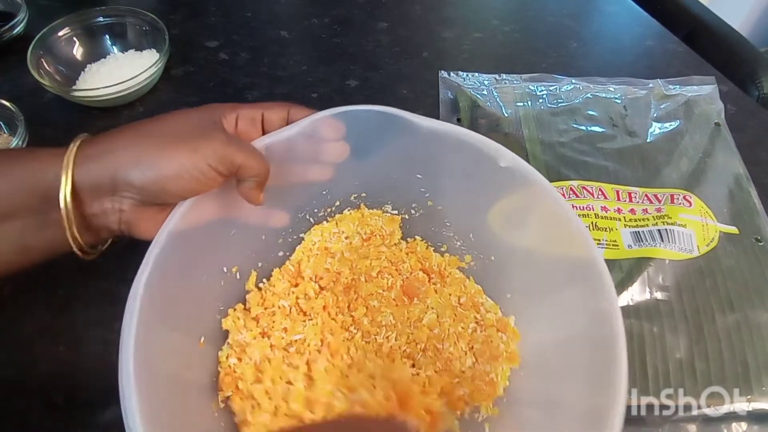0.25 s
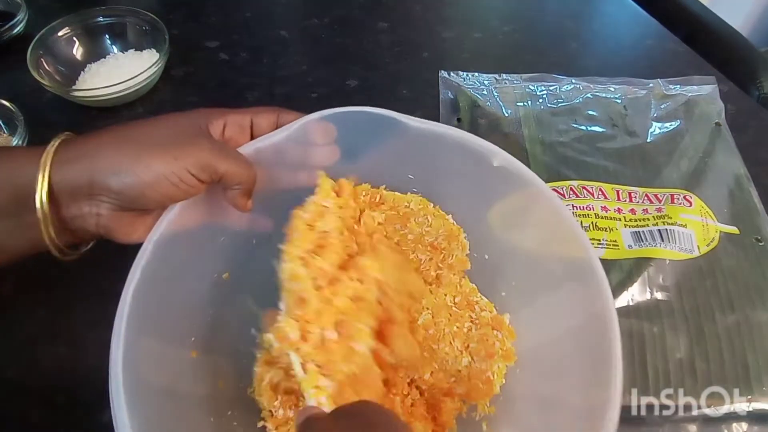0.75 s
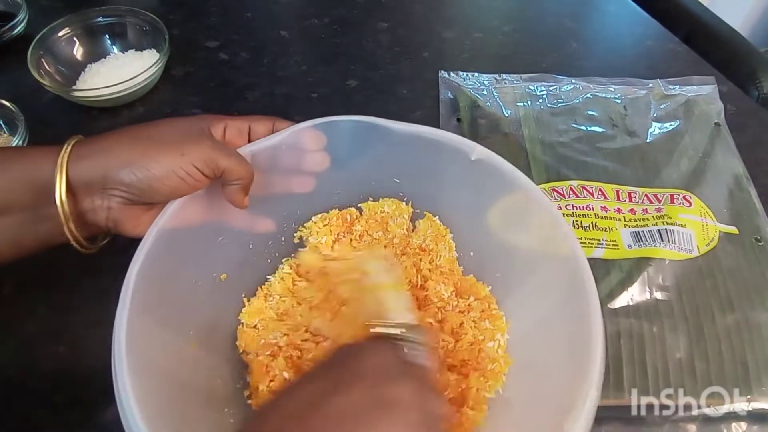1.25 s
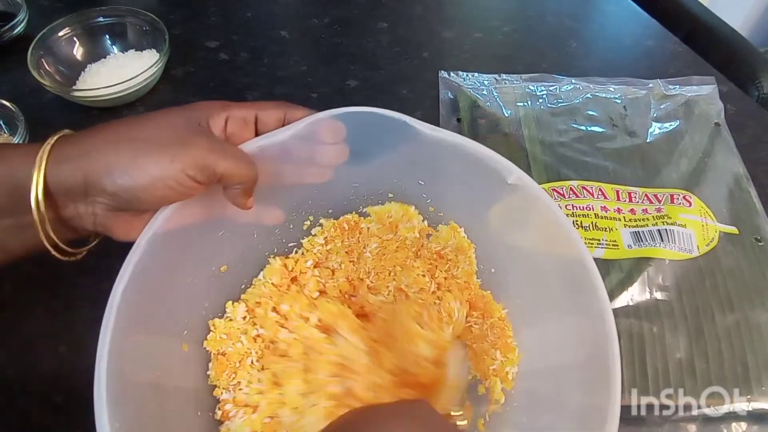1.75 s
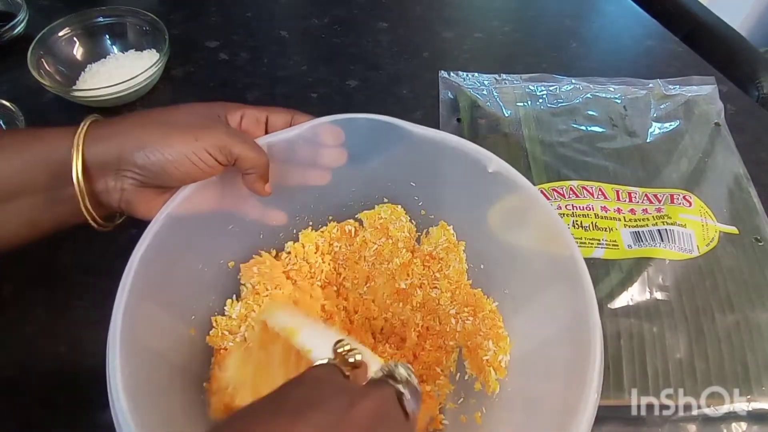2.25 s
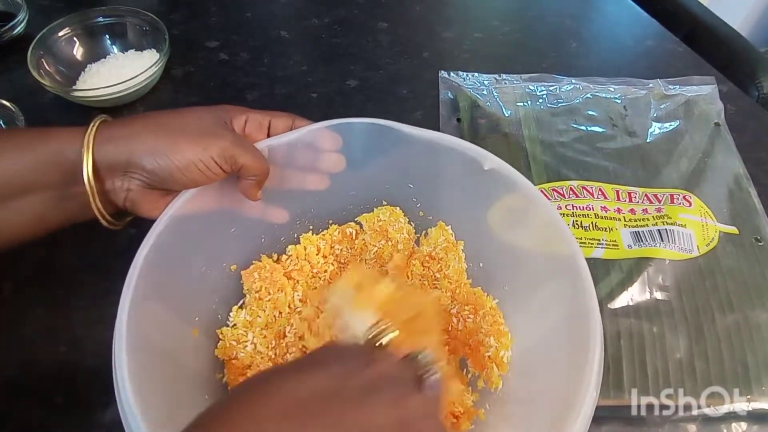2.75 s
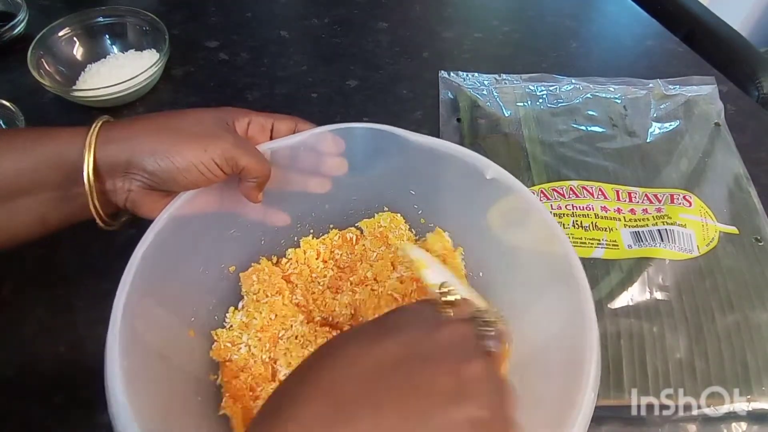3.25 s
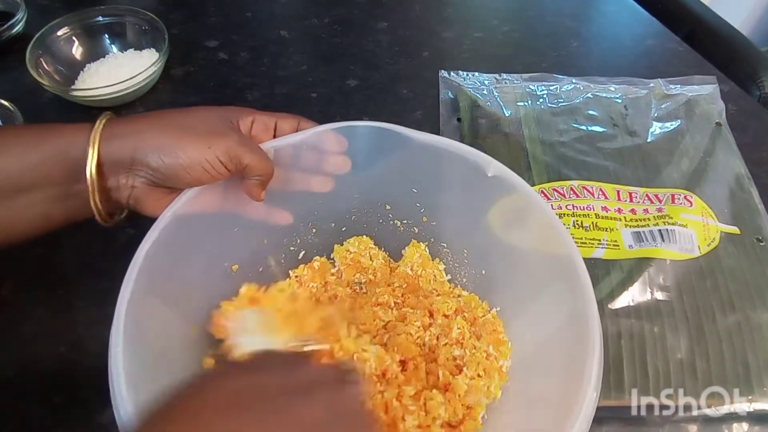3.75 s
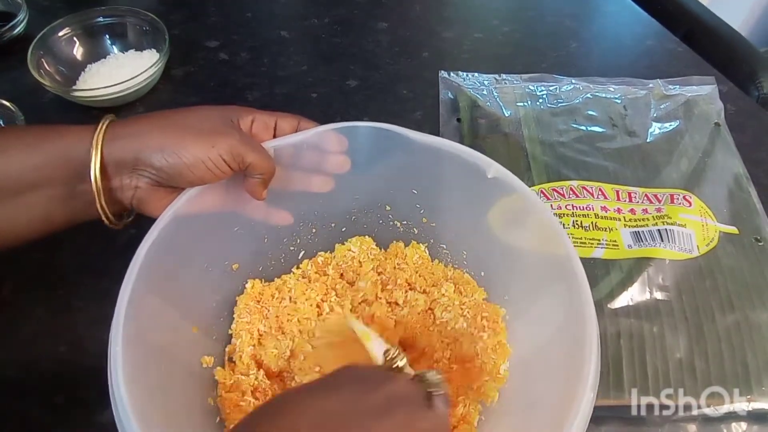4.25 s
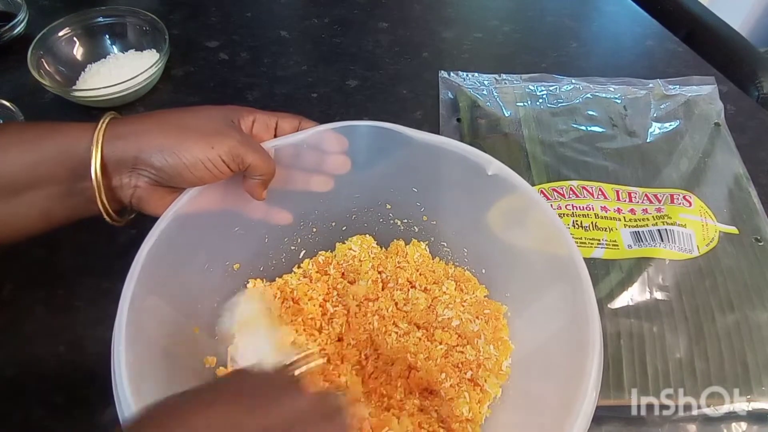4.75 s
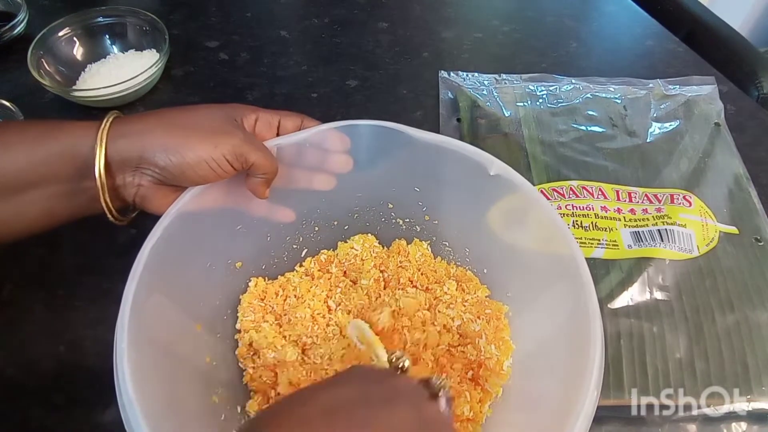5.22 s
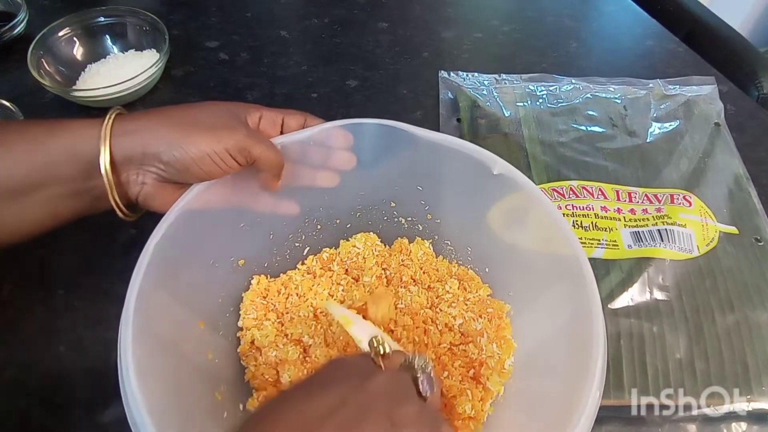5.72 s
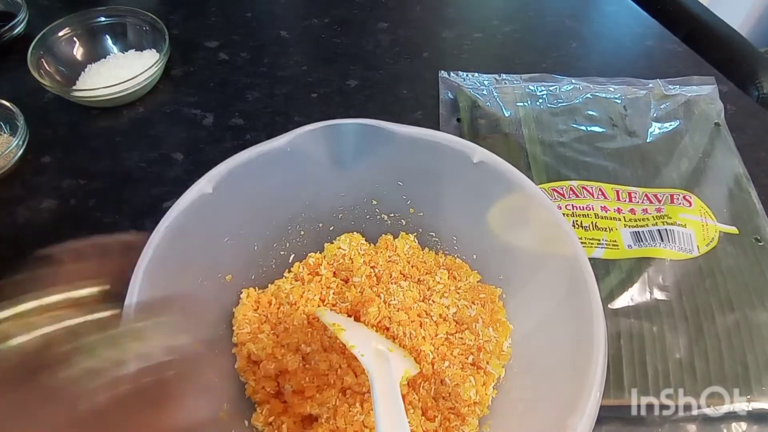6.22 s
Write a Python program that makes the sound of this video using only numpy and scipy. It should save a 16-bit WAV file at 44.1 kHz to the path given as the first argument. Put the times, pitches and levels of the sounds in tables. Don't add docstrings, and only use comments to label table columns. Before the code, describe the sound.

Close, rasping strokes through damp grit in a plastic bowl, punctuated by hard blade knocks, then lighter stirring and a final strong knock.

```python
import sys
import numpy as np
from scipy import signal
from scipy.fft import rfft, irfft, next_fast_len
from scipy.io import wavfile
from scipy.ndimage import uniform_filter1d, map_coordinates

SR = 44100
rng = np.random.default_rng(int(sys.argv[2]) if len(sys.argv) > 2 else 0)


def ratio(d):
    e = np.asarray(d, float) / 20
    return 10 ** e


def unload_wav(signal):
    wavfile.write(
        sys.argv[1],
        SR,
        np.round(np.clip(np.atleast_2d(signal).T, -1, 1) * 32767).astype(np.int16),
    )


N = 285617

# (frequency [Hz], level [dB per Hz])
FLAKE_COLOUR = [(7000, -27.5), (8500, 3), (10500, 0.5), (12500, -5.5), (15000, -2.5), (16000, -3.5)]


def unit(x):
    return x / np.sqrt(np.mean(x ** 2) + 1e-20)


def along(points, hz):
    f, v = np.transpose(points)
    return np.interp(np.log(hz + 1), np.log(f + 1), v)


def filtered(x, response):
    m = next_fast_len(N + SR // 2)
    return irfft(rfft(x, m) * response(np.fft.rfftfreq(m, 1 / SR)), m)[:N]


def coloured(x, points):
    return unit(filtered(x, lambda hz: ratio(along(points, hz))))


def resonated(x, peaks):
    def response(f):
        total = 0
        for k, (centre, width, db) in enumerate(peaks):
            damping = 1j * f * width
            total = total + (-1) ** k * ratio(db / 2) * damping / (centre * centre - f * f + damping)
        return total ** 2
    return unit(filtered(x, response))


def wobble(rate, count=N):
    at = np.arange(0, count + 8, 8)
    knots = rng.standard_normal(int(count * rate / SR) + 4)
    return np.interp(np.arange(count), at, map_coordinates(knots, [at * rate / SR]))


def swells(s, db, rise, fall):
    roundness = 1.457
    t = np.arange(0, N / SR, .002)
    late = t[:, None] - s
    shape = db - 20 * np.abs(late / np.where(late < 0, rise, fall)) ** roundness
    return np.interp(np.arange(N) / SR, t, np.sqrt((ratio(shape) ** 2).sum(axis=1)))


def grit(rate, spread_db, smooth, clump_db):
    size = ratio(spread_db * np.minimum(rng.exponential(size=N), 2.2))
    snaps = (rng.random(N) < rate / SR) * rng.standard_normal(N).clip(-2, 2) * size
    return ratio(clump_db * wobble(45)) * (unit(snaps) + smooth * rng.standard_normal(N))


def mottled(x, depth_db, size):
    z = signal.stft(x, nperseg=size)[2]
    field = uniform_filter1d(rng.standard_normal(z.shape), size=2, axis=0)
    field = uniform_filter1d(field, size=4, axis=1)
    return signal.istft(z * ratio(depth_db * unit(field)), nperseg=size)[1][:N]


def kitchen(x):
    # (frequency [Hz], t60 [s])
    decay = [(200, 0.28), (1000, 0.336), (4000, 0.33), (9000, 0.075)]
    hz, t, z = signal.stft(rng.standard_normal(SR // 2), SR, nperseg=256)
    tail = signal.istft(z * ratio(-60 * t / along(decay, hz)[:, None]), SR, nperseg=256)[1]
    delayed = np.pad(x, (170, 0))
    return signal.fftconvolve(delayed, tail / np.linalg.norm(tail))[:len(x) + SR // 2]


def air():
    # (frequency [Hz], level [dB per Hz])
    air_colour = [(15, -39.5), (35, -22), (96, 5.5), (156, -12), (199, 3.5), (303, -4), (514, -6.5),
                  (854, -7.5), (1270, -17), (2210, -12.5), (3740, -25), (4470, -21), (4880, -52),
                  (6340, -63.5), (10700, -120)]
    # (frequency [Hz], width [Hz], level [dB])
    hum_mode = [(208.4, 23, 0)]
    hiss = ratio(1.7 * wobble(27.0)) * coloured(rng.standard_normal(N), air_colour)
    hum = ratio(-9 + 2.1 * wobble(2.9)) * resonated(rng.standard_normal(N), hum_mode)
    return ratio(-78.5) * (hiss + hum)


def bangles():
    # (time [s], level [dB], frequency [Hz], t60 [s], unsteadiness [Hz])
    touches = [
        (0.0, -81, 4806, 0.22, 90),
        (0.0, -99, 4960, 0.471, 60),
        (0.155, -66, 3775, 0.43, 253.1),
        (0.158, -71, 4456, 0.341, 881.9),
        (0.992, -45, 4227, 0.0205, 500),
        (5.27, -62, 3673, 0.13, 118),
        (5.55, -55, 3574, 0.032, 300),
    ]
    out, t = np.zeros(N + SR), np.arange(SR // 2) / SR
    for s, db, hz, t60, rate in touches:
        onset = np.clip(t / 0.00386, 0, 1)
        shape = ratio(db - 60 * t / t60) * onset * wobble(rate, count=len(t))
        out[round(s * SR):][:len(t)] += shape * np.sin(2 * np.pi * hz * t)
    return out[:N]


def base():
    # (peak time [s], level [dB], fall over 20 dB [s])
    shifts = [(0.061, -74.5, -0.66), (1.23, -63.5, 0.2564), (1.62, -62, -0.05), (1.95, -60.5, -0.3055),
              (2.27, -66.5, -0.26), (2.56, -64.5, -0.42), (2.77, -66, 0.41), (3.62, -67, 0.0344),
              (4.05, -68.5, 0.21), (4.42, -67, 0.0535), (4.66, -65, -0.0878), (5.3, -71, 0.21)]
    # (frequency [Hz], width [Hz], level [dB])
    base_modes = [(201.2, 35, 3), (300, 37, -15)]
    s, db, fall = np.transpose(shifts)
    return swells(s, db, fall, fall) * resonated(rng.standard_normal(N), base_modes)


def slide():
    # (peak time [s], level [dB], fall over 20 dB [s])
    rocking = [(0.057, -64.5, -0.01), (0.301, -57.5, -0.06), (0.408, -55, -0.2327), (0.611, -48, -0.0769),
               (.816, -70, -0.4), (1.11, -64, 0.25), (1.39, -47.5, 0.0828), (1.612, -72, 1.51),
               (1.852, -42, 0.0038), (2.119, -41.5, 0.0036), (2.288, -69.5, 0.36), (2.67, -58, 0.14),
               (3.12, -44.5, 0.0717), (3.18, -53, 0.0976), (3.42, -39.5, 0.1031), (3.86, -69, 0.58),
               (4.24, -67, 0.15), (4.669, -49.5, 0.0843), (4.99, -49, 0.06), (5.063, -49, 0.0324),
               (5.3, -71.5, 0.27), (5.613, -69, 0.67), (5.898, -62, -0.7), (6.04, -50.5, 0.266),
               (6.12, -44, 0.02), (6.19, -54, 0.07), (6.28, -51, 0.15), (6.37, -51, -1.5),
               (6.45, -44, -0.174)]
    # (frequency [Hz], width [Hz], level [dB])
    counter_modes = [(92.6, 48, -3), (147.5, 43, 0), (206.1, 19, -1), (300, 35, -16)]
    s, db, fall = np.transpose(rocking)
    slips = grit(rate=66, spread_db=2.5, smooth=0.9, clump_db=3.5)
    gain = swells(s, db, 0.39 * fall, fall) + ratio(-92.5)
    return gain * resonated(slips, counter_modes)


def spray():
    # (time [s], level [dB], half-length [s])
    flicks = [
        (0.335, -81, 0.022),
        (0.488, -73.5, 0.03208),
        (1.816, -77, 0.03),
        (2.064, -67.5, 0.0015),
        (3.502, -89.5, 0.079),
    ]
    t = np.arange(N) / SR
    shape = sum(ratio(db) * np.exp(-((t - s) / half) ** 2) for s, db, half in flicks)
    return shape * coloured(grit(rate=530, spread_db=3.5, smooth=1.1, clump_db=6), FLAKE_COLOUR)


def knock(db, colour, crack_db, lasts):
    # (frequency [Hz], level [dB], t60 [s])
    bowl_modes = [(112, -15, 0.078), (229.6, -1.5, 0.14), (277, 5.5, 0.059), (384.1, 6.5, 0.049),
                  (425.4, 4.5, 0.078), (496.1, 5.5, 0.084), (548, 1, 0.04), (670, -13.5, 0.092),
                  (719, -26, 0.12), (940, -16.5, .06), (1016.6, 0, 0.018), (1086.2, 2.5, 0.054),
                  (1288.7, 0.5, 0.023), (1374.3, 2.5, 0.029), (1525.5, 0.5, 0.029), (1792, 0, 0.037),
                  (2040, -7, 0.037), (2229.7, -2.5, 0.015), (2581, -8, 0.064), (3005, 3, 0.0088),
                  (3391, -4, 0.0083), (3603, -13, 0.0083), (4230, -21, 0.024), (5220, -30, 0.0055),
                  (5940, -33.5, 0.038)]
    t = np.arange(int(lasts * SR / 7)) / SR
    late = t[:, None]
    hz, level_db, t60 = np.transpose(bowl_modes)
    luck_db, detune = rng.standard_normal((2, len(bowl_modes))) * [[1.5], [.006]]
    strength = ratio(db + level_db - 5 + along(colour, hz) + luck_db)
    press = 1 + 1.957 * np.exp(-late / 0.0026)
    start = 1 - np.exp(-late * hz * 1.176)
    decay = np.exp(-np.log(1000) * late / (lasts * t60))
    tones = np.sin(2 * np.pi * hz * (1 + detune) * late)
    ring = (strength * press * start * decay * tones).sum(axis=1)
    crack = ratio(crack_db + 5.5 - 60 * t / 0.006) * rng.standard_normal(len(t))
    band = signal.butter(2, [1500, 4800], "bandpass", fs=SR, output="sos")
    return (ring + signal.sosfilt(band, crack)) * (1 - np.exp(-t / 0.00023)) ** 2


def light_knocks():
    # (time [s], peak level [dB])
    ticks = [(0.9909, -50.5), (1.1292, -31.5), (1.148, -35.5), (1.172, -41.5), (1.5716, -28.5), (1.82, -19),
             (2.364, -50), (2.5305, -50), (2.9691, -52.5), (3.2306, -57), (3.843, -41.5), (4.152, -46)]
    tick_colour = [-28, -30, -30.5, -16.5]
    # (time [s], peak level of the top modes [dB], levels re peak near 220, 470, 1030 Hz [dB])
    taps = [(0.0744, -62.5, 2, -11, -5), (0.2357, -47.5, -3, 9.5, -23), (0.2462, -26, -19, -32, -18.5),
            (0.394, -31, -7.5, -8, -5), (0.4705, -21.5, -36.5, -19, -21.5),
            (0.7356, -47.5, -68.5, -0.5, -4), (1.077, -59.5, -4.5, 11, -19.5),
            (2.2647, -40.5, -22, -56.5, -14), (2.6589, -33.5, -20.5, -9.5, -8.5),
            (3.3118, -72, 33, 20, -21), (5.2848, -55.5, -25, -19, -10.5), (5.825, -53, -32, -21, -16),
            (5.8517, -43.5, -20.5, -24.5, -5), (5.8597, -44.5, -31, -20, 6.5),
            (5.8815, -61.5, -14.5, -5, 0), (5.8925, -49, -16, -7, 3.5), (6.2522, -56, 2.5, 10, 18)]
    # (time [s], peak level of the top modes [dB], # levels
    # re peak near 220, 470, 1030 and 1400 Hz [dB])
    rebounds = [(.5, -33, -21.5, -23, -14.5, 6.5), (.517, -33, -22, -16.5, -13, 4),
                (.54, -32, -25.5, -17, -12.5, 2.5), (.57, -33, -22.5, -19.5, -7.5, 1.5),
                (1.335, -36, -20, -0.5, 11, -0.5), (1.35, -37.5, -19, 5, 6.5, 1),
                (1.511, -66.5, -3.5, 5, -3, -4.5), (1.808, -46.5, 6, 9.5, 1.5, -5.5),
                (1.918, -36, -23.5, -23.5, -0.5, 6), (2.105, -39.5, -2.5, -1, 0, 5.5),
                (3.165, -60, 14.5, 15, -9.5, -10), (3.422, -49.5, -3.5, 11.5, -10, -11),
                (3.462, -52, 13.5, 7.5, -8.5, -6.5), (4.963, -38, -18, -10, -6, 5.5),
                (4.987, -50.5, 6, 9.5, -5.5, -6), (5.008, -41.5, 1, -1.5, 4, 9.5),
                (5.055, -54, 9.5, 12, -4.5, 2.5), (5.066, -60.5, 19, 3, -10.5, -11.5),
                (6.046, -39, -12, 5.5, 4, 8.5), (6.066, -41, -16, 3.5, 1.5, 11.5),
                (6.108, -50, 16, 11.5, 3, 6), (6.165, -61, 17, 11.5, -7.5, -1.5),
                (6.28, -64.5, 8.5, 18.5, -7.5, -1)]
    colour_hz = [220, 470, 1030, 1400, 1800]
    rim_share = 0.21
    spots = [(s, db, *tick_colour, 0.55, -0.5) for s, db in ticks]
    spots += [(*row, rim_share * min(row[-1], 0), 0.65, -2.5) for row in taps]
    spots += [(*row, 0.44, -12) for row in rebounds]
    out = np.zeros(N + SR)
    for s, db, *colour, lasts, crack_db in spots:
        sound = knock(db, list(zip(colour_hz, [*colour, 0])), db + crack_db, lasts)
        out[round(s * SR):][:len(sound)] += sound
    return out[:N] + ratio(-8) * kitchen(out[:N])[:N]


def hard_blows():
    # (time [s], peak level [dB], levels re peak near 400, 520 and 1030 Hz [dB])
    blows = [
        (1.3307, -14, -19.5, -8.5, -1.5),
        (2.0601, -11.5, -14, -21.5, -10),
        (3.1156, -32, 3.5, -5, -30),
        (3.3755, -20, 2.5, -7, -20.5),
        (4.9398, -19.5, -11, -17.5, -31.5),
        (6.003, -13.5, -20, -11, -6),
    ]
    # (crack level [dB], levels re crack near 1350, 1800, 2300 and 3000 Hz [dB])
    edges = [(-37, 20.5, 20.5, -4, 17.954), (-28, 12.5, 14, 0.5, 10.42), (-39, 0, -4.5, 3.5, 3.5),
             (-24.5, -9.5, -7, -3.5, 3.6), (-28.5, 11, -12.5, -3, 9.8), (-29, 15, 14.5, 8, 12.87)]
    blow_hz = [220, 400, 520, 1030, 1350, 1800, 2300, 3000]
    out = np.zeros(N + SR)
    for (s, db, *low), (crack_db, *high) in zip(blows, edges):
        lowest = low[0] - 9
        colour = [lowest] + low + [c + crack_db - db for c in high]
        sound = knock(db, list(zip(blow_hz, colour)), crack_db, 0.978)
        answer = ratio(-8) * kitchen(sound)
        out[round(s * SR):][:len(sound)] += sound
        out[round(s * SR):][:len(answer)] += answer
    return out[:N]


def knocks():
    def soft_blade(hz):
        bend = 830 ** 2 - hz ** 2
        dip = (bend + 1j * hz * 150) / (bend + 1j * hz * 320)
        return dip / (1 + 1j * hz / 5200 * 1.674 - (hz / 5200) ** 2) ** 2
    return filtered(hard_blows() + light_knocks(), soft_blade)


def strokes():
    # (peak time [s], rasp level [dB], rise over 20 dB [s], fall over 20 dB [s],
    # lower wall ring re rasp [dB])
    scrapes = [(.01, -76, 0.0477, 0.045, -5.5), (.065, -79, 0.0142, 0.0303, 17.5),
               (.26, -42.5, 0.0315, 0.43, -2), (.41, -48, 0.133, 0.16, 3),
               (0.522, -36, 0.1805, 0.187, -10.5), (1.142, -49.5, 0.106, 0.142, -5),
               (1.416, -38.5, 0.074, 0.153, -7.5), (1.811, -37, 0.0612, 0.2453, -11),
               (2.652, -40.5, 0.0837, 0.1436, -5), (3.1, -48, 0.0734, 0.141, -5.5),
               (3.389, -41, 0.0326, 0.217, 2), (3.541, -42, 0.1684, 0.1262, -22.5),
               (3.887, -45.5, 0.0578, 0.1067, -13), (4.29, -48.5, 0.085, 0.0764, -8.5),
               (4.641, -57.5, 0.0806, 0.0694, -5.5), (5.311, -62, 0.0386, 0.125, -5),
               (5.599, -60.5, 0.1072, 0.162, 3), (5.82, -65, 0.135, 0.06755, -1),
               (5.9, -60.5, 0.116, 0.0445, 0)]
    # (peak time [s], rasp level [dB], fall [s],
    # upper wall ring re rasp [dB], lower wall ring re rasp [dB])
    judders = [(.524, -45.5, 0.109, 11.5, -13), (1.37, -45, 0.119, 12, 6.5), (2.4, -64, 0.12, 4.5, -3),
               (4.3, -61, 0.0737, 9, -10.5), (1.829, -51, 0.106, 1, 10), (1.925, -47, 0.079, 14.5, -15),
               (2.099, -44.5, 0.1684, 8, -1), (5.0, -50, 0.112, 2, 2), (5.078, -66, 0.064, 5, 10),
               (6.054, -44, 0.1222, 10, 9), (6.2, -65, 0.081, 14.5, 12.5), (6.3, -83.5, 0.087, 9.5, 28),
               (6.46, -88.5, 0.199, 4, 27)]
    # (peak time [s], rasp level [dB],
    # rise [s], fall [s], meal hiss re rasp [dB])
    skims = [(.2, -78.5, 0.057, 0.031, -8.5), (.33, -52, 0.096, 0.155, -13.5),
             (0.871, -53.5, 0.71, 0.1304, -31.5), (1.573, -51, .005, 0.083, -28),
             (2.42, -57, 0.04085, 0.086, -28.5), (2.969, -69, 0.00889, 0.0324, -42),
             (3.233, -59, 0.0061, 0.0203, -11), (4.0, -68, 0.03725, 0.064, -18),
             (4.152, -57, 0.0121, 0.05, -37.5), (5.02, -62, 0.0427, 0.034, -16),
             (5.12, -75.5, .04, 0.039, -11.5), (5.295, -71.5, 0.037, 0.059, -10),
             (5.59, -64.5, 0.026, 0.035, -11.5)]
    # (peak time [s], level [dB], rise [s], fall [s])
    flexes = [
        (.01, -71, 0.029, 0.0385),
        (0.248, -44, 0.0075, 0.0227),
        (2.39, -57, 0.061, 0.108),
        (4.16, -60.5, .015, 0.052),
    ]
    # (frequency [Hz], level [dB per Hz])
    rasp_colour = [(700, -35.5), (1000, -14.5), (1300, -6), (1700, 3), (2400, 3.5), (3200, -1),
                   (3950, -7.5), (4500, -13), (5000, -23), (5600, -30.5), (7000, -72)]
    # (frequency [Hz], level [dB per Hz])
    meal_colour = [(4500, -25.5), (5500, -10), (6300, 3), (7200, -7), (7900, -21.5), (9000, -42.5)]
    # (frequency [Hz], width [Hz], level [dB])
    upper_modes = [(1023.5, 300, -2.5), (1287, 420, 2)]
    lower_modes = [(310, 15, -8.5), (370.8, 40, -2.5), (431.2, 37, 3), (500, 31, 1.5), (548.3, 34, 3),
                   (642.7, 68, -5.5), (780.7, 36, -8.5)]
    # (frequency [Hz], width [Hz], level [dB])
    tip_mode = [(1706, 600, 0)]

    rows = []
    for s, db, rise, fall, low in scrapes:
        weight = db + 44.5
        rows.append((s, db, rise, fall, -6.5 + .05 * weight, low, -28.5 - 0.042 * weight))
    rows += [(s, db, 0.25 * fall, fall, up, low, -46) for s, db, fall, up, low in judders]
    rows += [(s, db, rise, fall, -15, -15, meal) for s, db, rise, fall, meal in skims]
    s, db, rise, fall, upper_db, lower_db, meal_db = np.transpose(rows)

    rest = ratio(-101)
    rub = swells(s, db, rise, fall) + rest
    upper = swells(s, db + upper_db, rise, fall) + rest
    lower = swells(s, db + lower_db, rise, fall) + rest
    fine = swells(s - .01, db + meal_db, rise, 0.93 * fall) + ratio(-111)

    crumbs = grit(rate=900, spread_db=2.5, smooth=1.5, clump_db=1)
    rasp = rub * coloured(mottled(crumbs, depth_db=3.0, size=1024), rasp_colour)
    hiss = fine * coloured(crumbs, meal_colour)
    walls = ratio(-6.0) * upper * resonated(crumbs, upper_modes)
    walls += ratio(-3.5) * lower * resonated(crumbs, lower_modes)
    tip = swells(*np.transpose(flexes)) * resonated(crumbs, tip_mode)
    sheen = ratio(-88.0) * (fine * ratio(64.0)) ** 0.49 * coloured(crumbs, FLAKE_COLOUR)
    return ratio(-1.0) * (rasp + walls + hiss) + sheen + tip


def scene():
    background = air() + bangles() + base() + slide()
    rub = strokes()
    stirring = rub + ratio(-18.5) * kitchen(rub)[:N] + spray() + knocks()
    fade_out = np.clip((N - np.arange(N)) / SR / .004, 0, 1)
    return (fade_out * (background + stirring))[None]


def band_limit(x):
    return signal.sosfilt(signal.butter(12, 15750, fs=SR, output="sos"), x)


def record(dry):
    # (frequency [Hz], level [dB per Hz])
    capsule_colour = [(20, -4), (45, 14.5), (70, 9.5), (150, -8.5), (5000, -17.5), (16000, -14.5)]
    thin = filtered(dry[0], lambda hz: (1j * hz / (1j * hz + 70)) ** 2)
    mix = thin + ratio(-89.5) * coloured(rng.standard_normal(N), capsule_colour)
    return band_limit(mix)


dry = scene()
out = record(dry)
unload_wav(out)
```